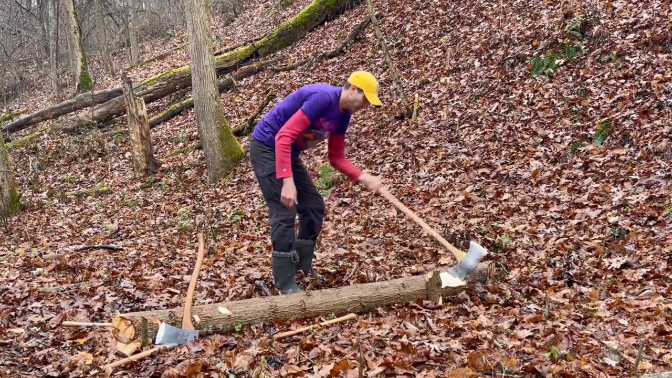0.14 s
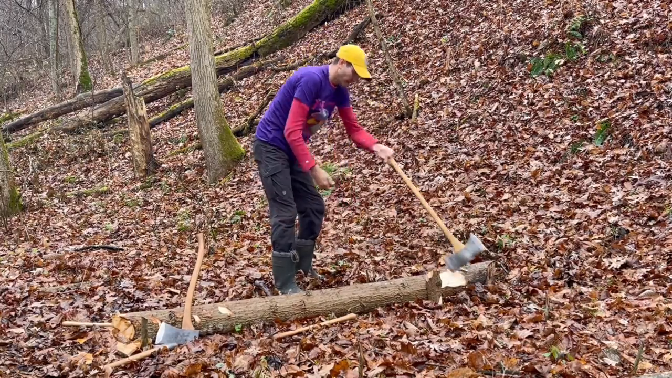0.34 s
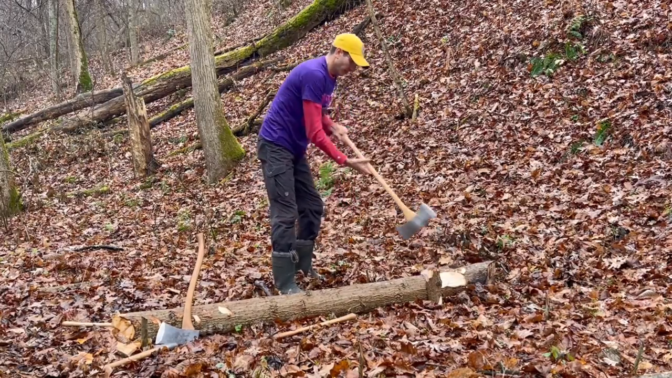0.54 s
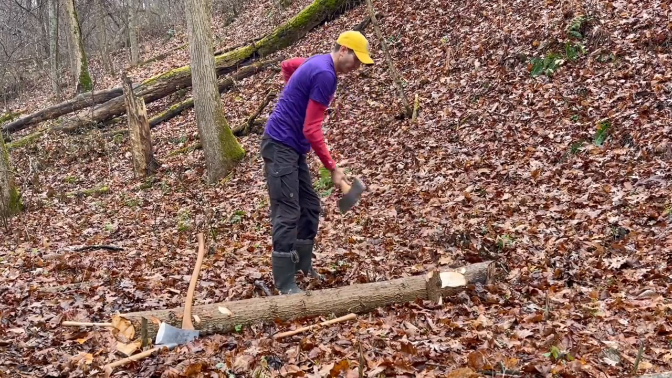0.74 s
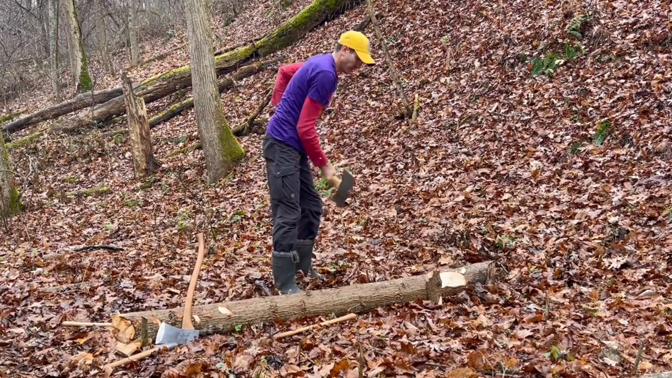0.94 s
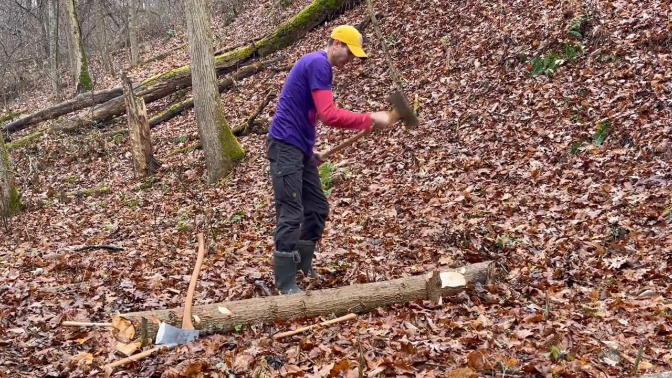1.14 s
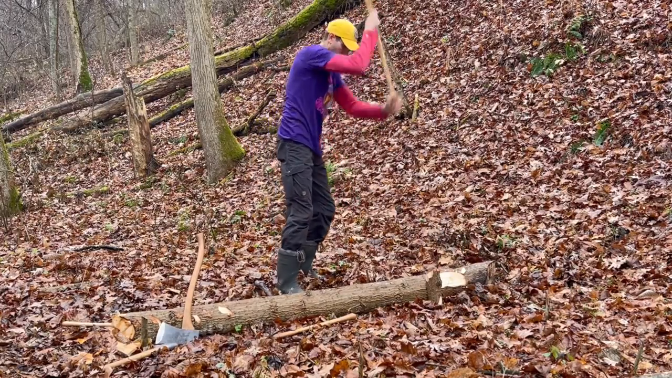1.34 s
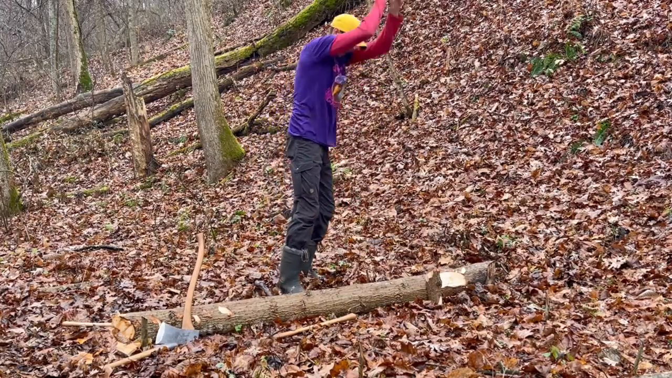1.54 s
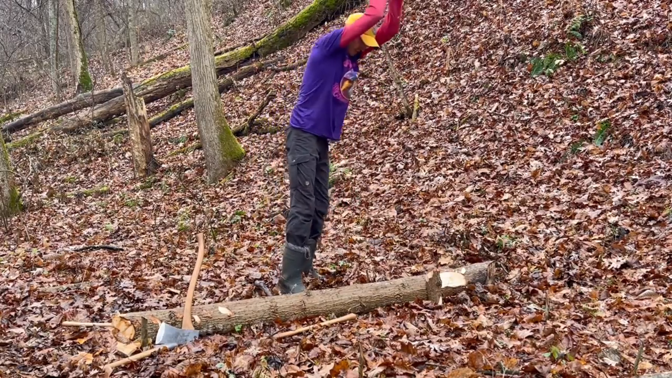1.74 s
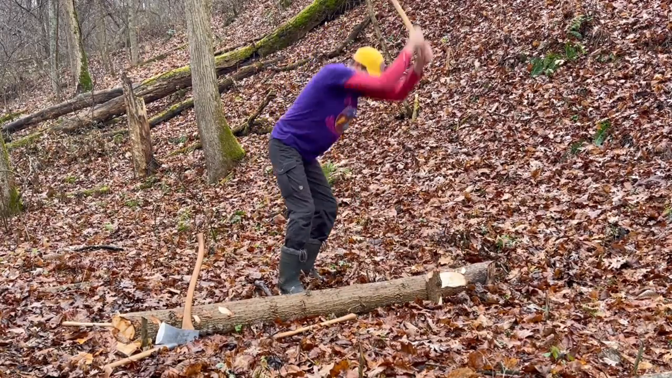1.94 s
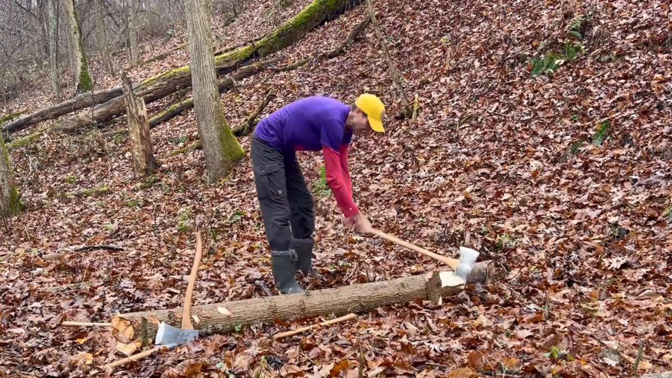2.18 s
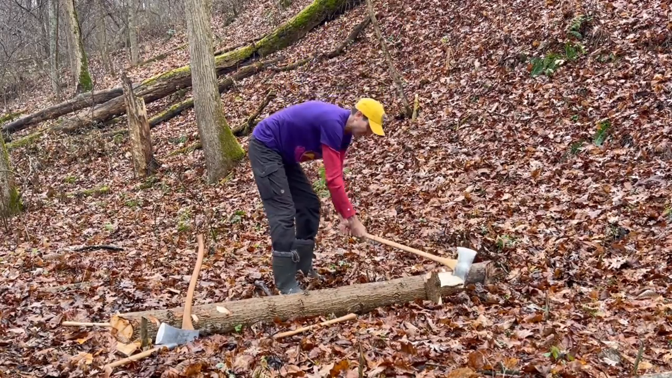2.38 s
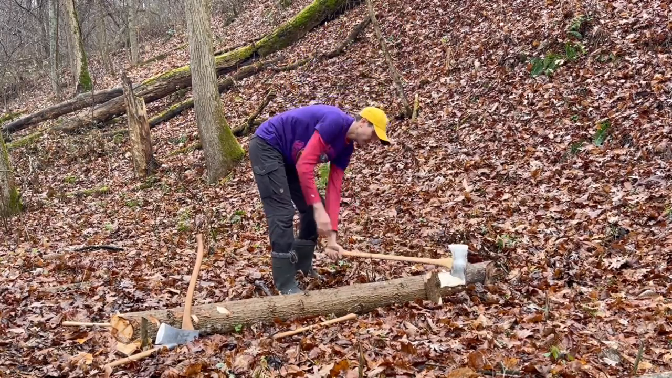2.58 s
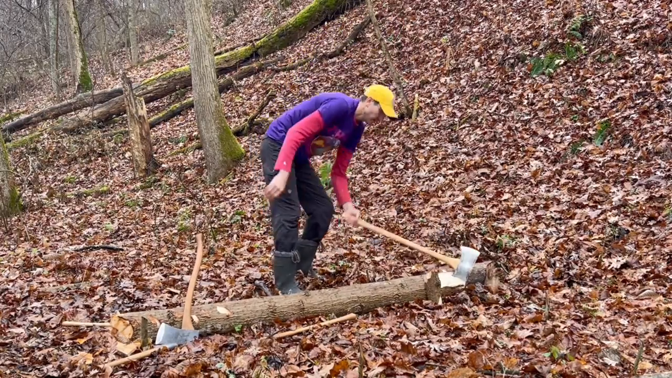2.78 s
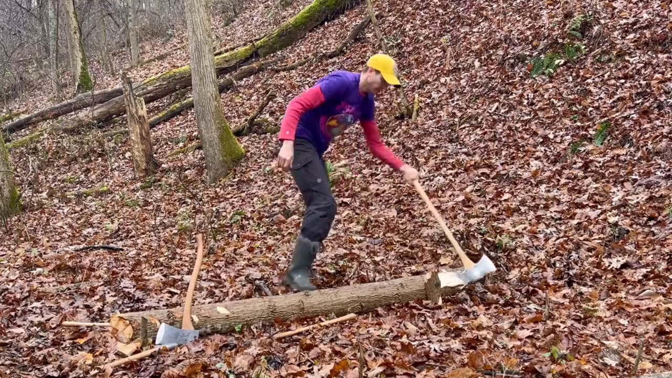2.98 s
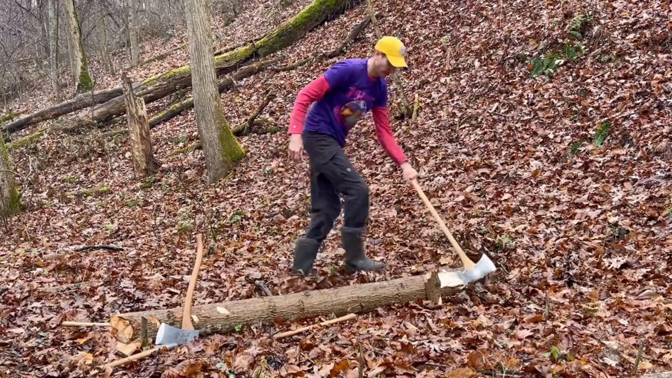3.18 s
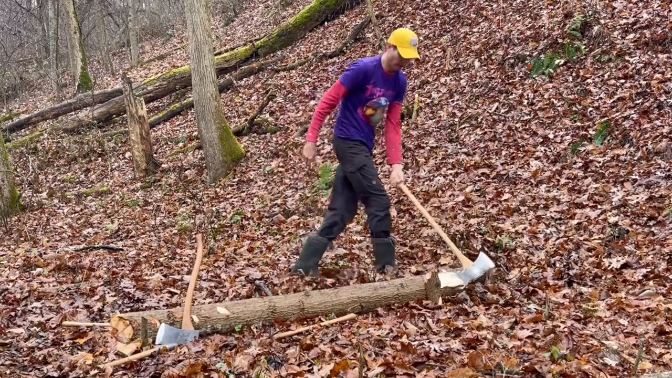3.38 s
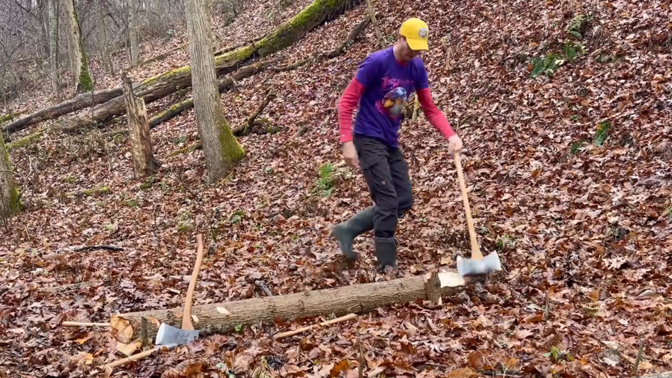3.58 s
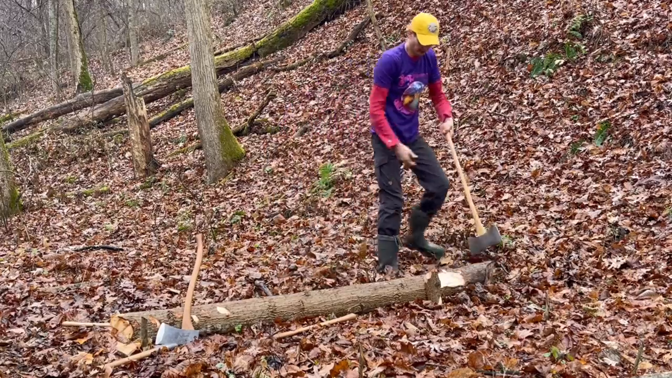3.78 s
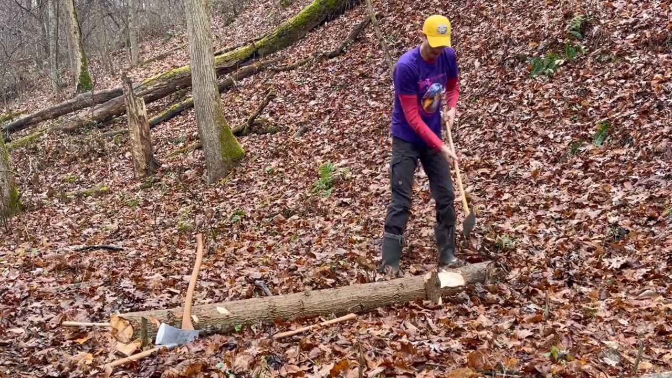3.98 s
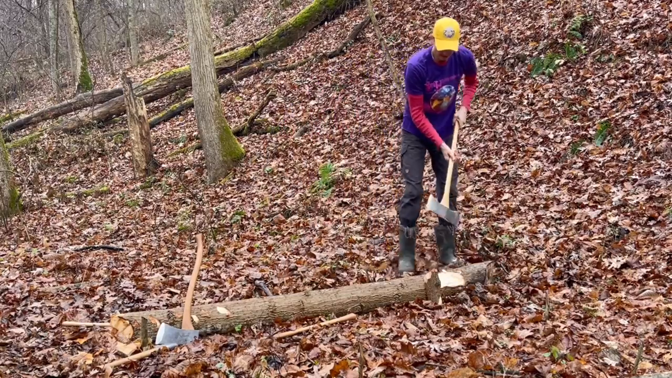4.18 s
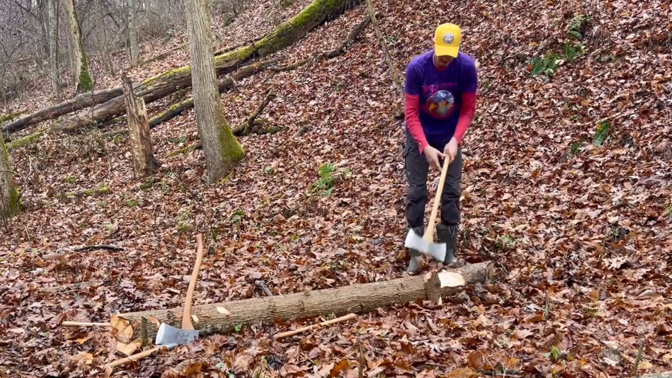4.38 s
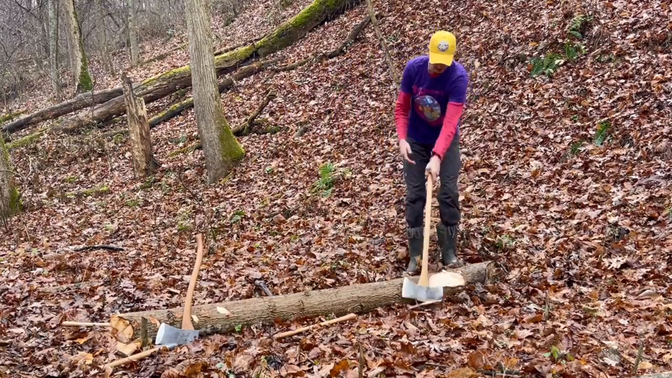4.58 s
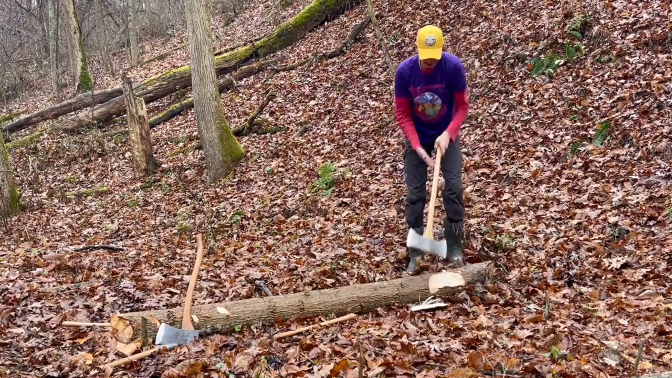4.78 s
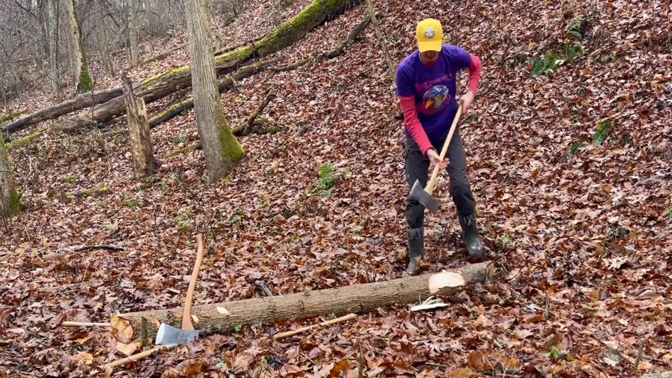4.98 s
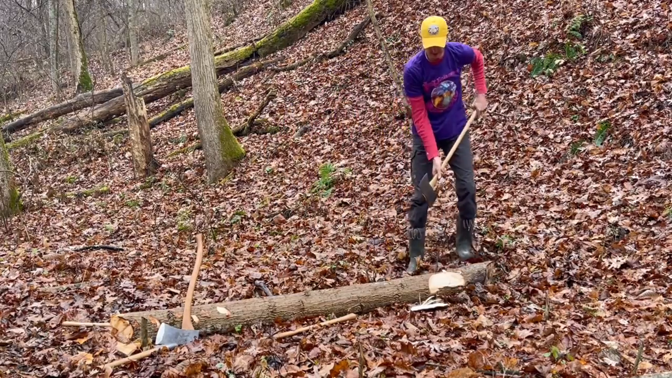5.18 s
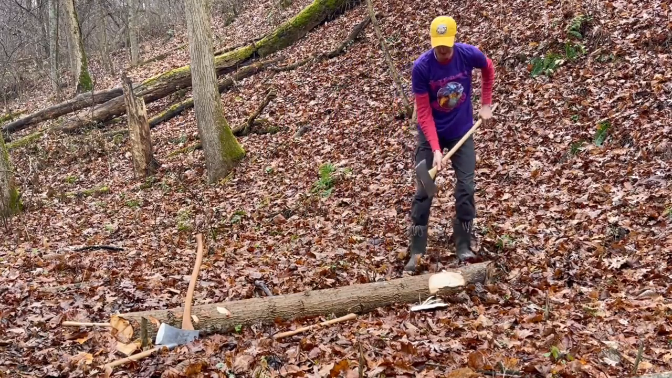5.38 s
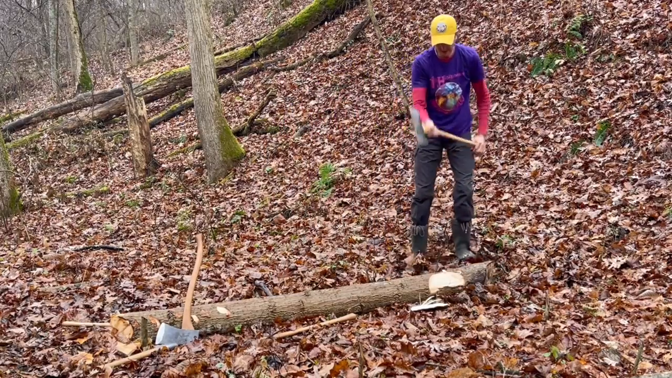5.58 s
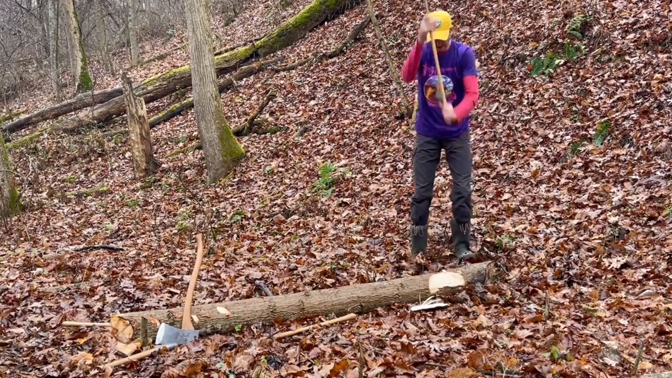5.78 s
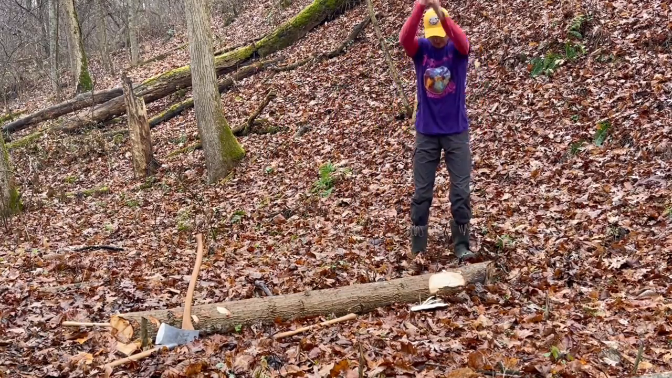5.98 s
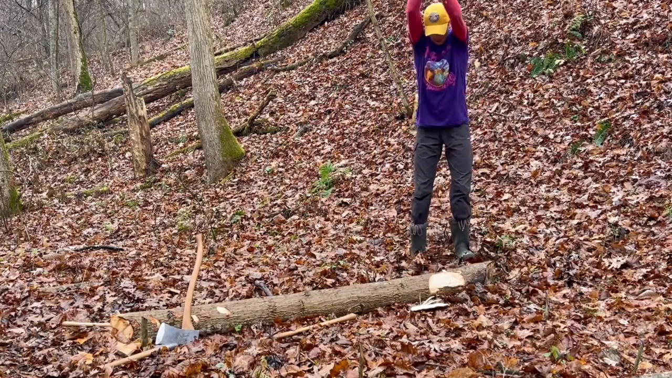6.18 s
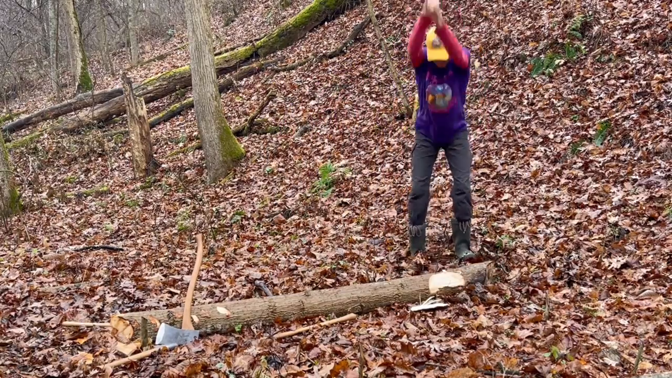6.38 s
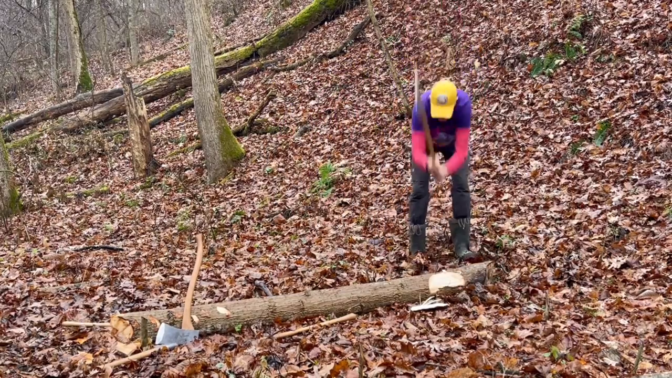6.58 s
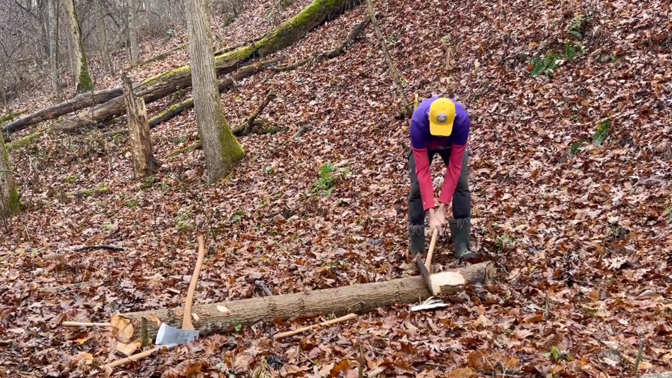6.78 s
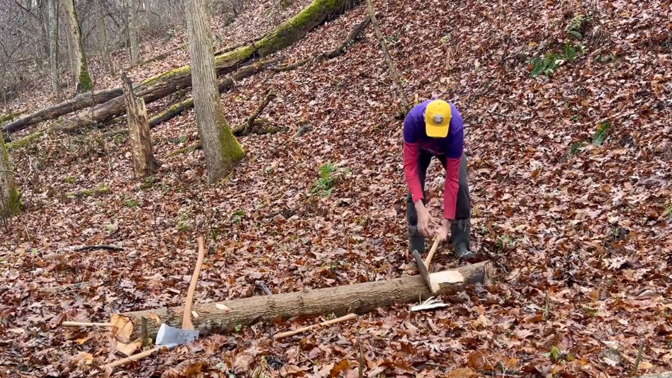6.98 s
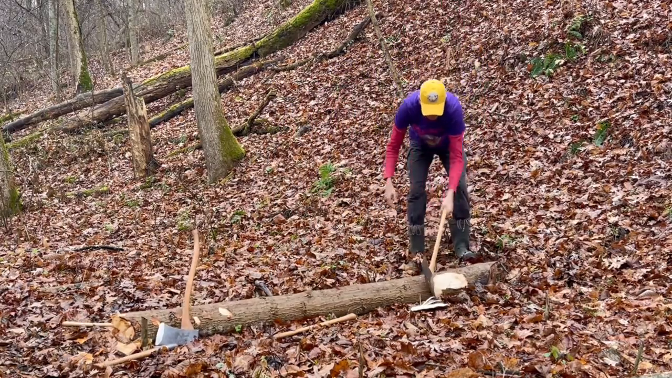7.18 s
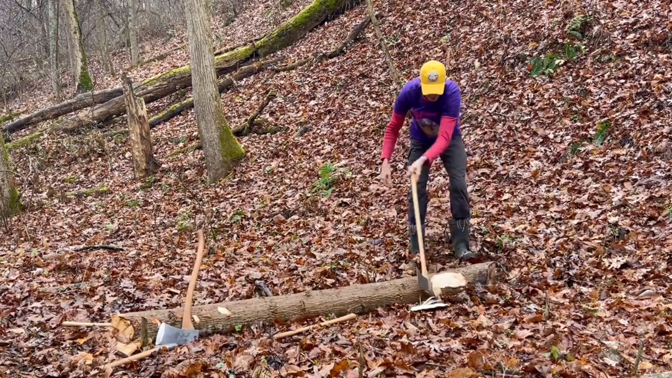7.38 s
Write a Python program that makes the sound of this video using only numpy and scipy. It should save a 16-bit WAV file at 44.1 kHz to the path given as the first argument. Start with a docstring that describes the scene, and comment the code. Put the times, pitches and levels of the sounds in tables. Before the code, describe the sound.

On a quiet leafy slope, an axe strikes a log twice, trees answering each crack, amid rustling steps, light knocks and a creaky blade-freeing.

```python
"""Still air with a faint far drone and whine, then boots wading through dry leaves and twigs snapping.
Two heavy axe blows split a log on a wooded hillside; the log rings and thuds on the soil, and trees echo
each crack. In between, the axe nudges the log; at the end the stuck blade is levered in its cut.
Breaks are short noise bursts, wood and steel are decaying modes, leaves are filtered random clicks,
and echoes are decaying noise: dense tails for all blows, extra returns for the swings."""
import sys
import numpy as np
from scipy import signal
from scipy.fft import rfft, irfft, next_fast_len
from scipy.io import wavfile

SR = 44100
rng = np.random.default_rng(int(sys.argv[2]) if len(sys.argv) > 2 else 0)


def log_audio(samples):
    """Write samples as a 16-bit WAV file to the path given in sys.argv[1]."""
    # one column per channel
    frames = np.atleast_2d(samples).T
    # limit to full scale, then quantise
    limited = np.clip(frames, -1, 1)
    pcm = np.round(limited * 32767).astype(np.int16)
    wavfile.write(sys.argv[1], SR, pcm)


N = 327663
T = np.arange(N) / SR

# distant air: (frequency [Hz], level [dB])
AIR_SPECTRUM = [(20, -57.5), (50, -39.5), (85, -38.5), (130, -50.5), (230, -61.5), (500, -57), (720, -59),
                (1100, -67.5), (2400, -76.5), (4000, -84), (9000, -86), (11500, -92), (14000, -106)]
# far whine coming and going: (time of peak [s], level added to the rest level [dB], rise and fall [s])
WHINE_SWELLS = [(0, -76, .5), (1.0, -72.5, .4), (2.6, -70.5, .5), (5.65, -73.5, .7)]
WHINE_REST_DB = -83.5
# boot sweeps through leaves: (time of peak [s], relative crunch level [dB],
# crisp over crunch before their gains [dB], rise [s], fall [s])
LEAF_SWEEPS = [(0.02, -64.5, 3.5, 0.17, 0.083), (0.18, -63, 3, 0.074, 0.079), (0.45, -72, 7, 0.073, 0.063),
               (1.28, -83, 9, .1, 0.16), (1.87, -73.5, -2, 0.21, 0.45), (2.75, -63.5, -1.5, 0.14, 0.092),
               (2.88, -62, 8, 0.06, 0.064), (3.06, -55, 4, 0.14, 0.067), (3.371, -60, 5.5, .11, 0.12),
               (3.69, -56, 0.5, .11, 0.083), (4.0, -60.5, 3.5, 0.22, 0.16), (4.109, -62.5, 5, 0.07, 0.05),
               (4.275, -53, 0.5, 0.015, 0.097), (4.4, -63, 7, 0.11, 0.098), (4.78, -62.5, 4, 0.21, 0.066),
               (4.95, -60.5, 2, 0.12, 0.12), (5.257, -58, 3.5, .08, 0.07), (5.73, -76.5, 5.5, .07, 0.13),
               (5.88, -78, -4, .3, .13), (6.3, -71.5, 1, 0.13, .16), (6.98, -65.5, -1.5, 0.09, 0.16),
               (7.14, -64.5, -4.5, 0.082, 0.13), (7.42, -67, -5, 0.073, .08)]
SWELL_SHAPE = 1.4  # exponent: 1 = pointed, 2 = bell-shaped
REST_CRUNCH_DB, REST_CRISP_DB = -80.5, -86  # leaves under a standing body, before their gains
# leaf crunch colour: (frequency [Hz], level [dB])
CRUNCH_COLOUR = [(100, -2), (220, 0), (450, -4.5), (900, -1), (1500, 0), (2200, 2), (3200, -4), (5000, -11),
                 (14000, -48.5)]
# crisp leaf-top colour: (frequency [Hz], level [dB])
CRISP_COLOUR = [(1000, -25.5), (2500, -1), (4000, -1), (5500, 0.5), (8000, -5), (10000, -3.5), (11400, -3),
                (12600, -22), (16000, -35)]
# breaking twigs and stalks, plus the sharp contact cracks of the axe knocking the log at 3.403, 4.255 and 4.325
# s: (time [s], relative level [dB], brightness [dB/octave])
SHARP_SNAPS = [(0.064, -45.5, 0.5), (0.109, -41, -4), (0.342, -58.5, 4.5), (0.375, -55.5, 1),
               (0.44, -49.5, -6), (0.623, -52.5, 0), (0.665, -59, -0.5), (0.731, -49.5, -4), (1.162, -56, 0),
               (1.169, -55.5, 1), (1.3425, -45.5, 0), (1.494, -57, -3.5), (1.53, -53, -6), (2.71, -46, -2),
               (3.403, -31, -2), (3.582, -49, -6.5), (3.609, -47.5, 0.5), (4.211, -53, -1.5),
               (4.255, -40, -2), (4.325, -39, -6.5), (5.049, -62, 6.5), (5.141, -57, 1.5), (5.494, -61.5, 2),
               (5.777, -58.5, 1.5), (7.133, -44.5, -1)]
# dry twig colour: (frequency [Hz], level [dB])
TWIG_COLOUR = [(150, -15.5), (900, -2), (2500, 0.5), (6000, -1), (11000, -2.5), (15000, -26.5)]
TWIG_PIVOT_HZ, TWIG_TILT_OCTAVES = 2389, 2.5  # tilt centre; tilt range each way
# scatter from nearby ground: (frequency [Hz], relative level [dB])
GROUND_COLOUR = [(100, -15.5), (400, -3.5), (1000, -6), (2500, -3), (5000, -2.5), (9000, 3), (11500, -2.5),
                 (15000, -8.5)]
# scatter from the trees: (frequency [Hz], relative level [dB], t60 [s])
TREE_SCATTER = [(100, -34.5, .7), (260, -43, .7), (500, -36, 1.8), (1000, -36, 1.4), (2400, -33, 0.96),
                (4022, -34, 1.4), (8000, -27.5, 1.3), (11500, -38, .8), (14040, -39.5, .6)]
# full swings: (time [s], splitting level [dB], cutting time [s], splintering t60 [s])
SWINGS = [(1.9716, 2.5, 0.0029, 0.019), (6.4729, -0.5, 0.0054, 0.0062)]
# splitting wood: (frequency [Hz], relative level in first swing [dB], in second [dB])
SPLIT_COLOUR = [(100, -17.5, -18.5), (190, -3.5, -1), (330, -3, 5), (520, -2.5, -3.5), (885, 4, -4.5),
                (1401, 0, -2.5), (1920, -5, -4.5), (2830, -3.5, -7.5), (3744, -18, -11), (5630, -18.5, -13),
                (7974, -28, -17.5), (12200, -22.5, -20.5), (13500, -41, -43)]
# log bending modes: (frequency [Hz], t60 [s], level struck near the end [dB], struck further in [dB])
LOG_MODES = [(101.7, 0.49, -26.5, -26.5), (263, 0.21, -18, -19), (458, 0.091, -15.5, -12),
             (650, 0.051, -14, -13.5), (864, 0.055, -13, -15.5), (1111.4, 0.053, -22.5, -15),
             (1334, 0.091, -28.5, -27), (1690, 0.046, -26, -37)]
# axe modes: (frequency [Hz], t60 [s], level in first swing [dB], in second [dB])
AXE_MODES = [(2130, 1, -60.5, -50), (2210, 0.96, -59.5, -51), (2320, .6, -60.5, -51),
             (2380, .06, -30.5, -28), (2860, 0.11, -34.5, -51.5), (3420, 0.034, -42.5, -21)]
# log pressing into soil: (time [s], peak level [dB], frequency [Hz], swell time [s])
SOIL_THUDS = [(1.973, -16, 170, 0.0052), (1.992, -25, 55, 0.017), (2.098, -39.5, 52, 0.022),
              (2.135, -42.5, 108.2, 0.021), (4.257, -30, 200, 0.0024), (4.297, -32, 135, 0.0052),
              (6.476, -24, 168, 0.0074), (6.493, -25.5, 54.6, 0.016), (6.602, -45, 54.3, 0.027)]
# first trunk's answer: (frequency [Hz], level relative to first swing [dB], to second [dB])
TRUNK_COLOUR = [(200, -55, -56), (900, -32, -42), (1800, -30.5, -43), (2200, -36, -18.5),
                (2870, -33.5, -47), (3600, -54, -40.5), (11000, -64, -56), (15000, -90, -90)]
TRUNK_LAG_S = .119
# far slope's answer: (frequency [Hz], level relative to first swing [dB], to second [dB])
SLOPE_COLOUR = [(149, -40.5, -41.5), (266, -37.5, -43.5), (473, -36.5, -34.5), (780, -38.5, -51),
                (900, -32.5, -41), (1048, -38, -39.5), (1400, -42.5, -61), (1910, -39.5, -43),
                (2200, -38, -30.5), (2530, -36.5, -50), (2770, -41.5, -40), (3070, -56.5, -49),
                (10800, -67, -79), (15000, -110, -110)]
# boots and axe head on the leaf bed: (time [s], thump level [dB], crush level [dB], swell time [s])
LEAF_TREADS = [(3.34, -47, -61, 0.012), (3.373, -48, -69, 0.011), (3.402, -38, -41, 0.0036),
               (3.427, -53, -74, 0.014), (3.60, -55, -56.5, 0.019), (3.675, -53, -64, 0.023),
               (4.256, -50, -46.5, 0.0072), (4.909, -54.5, -57.5, 0.02), (6.946, -55, -75, 0.015)]
# soil thump colour: (frequency [Hz], level [dB])
SOIL_COLOUR = [(50, -5), (110, 2.5), (200, 0.5), (300, -7), (450, -16), (900, -26), (4000, -66)]
# light blows on the log: (time [s], level over the log modes [dB], softness cut-off [Hz])
LOG_KNOCKS = [(3.403, -33, 2200), (4.254, -26.5, 1510), (4.2952, -0.5, 351), (4.3192, -23.5, 2200),
              (4.325, -29, 1800)]
# squeaks, and a faint far chirp at 5.39 s: (time of peak [s], frequency at peak [Hz], fall [Hz/s], level [dB],
# half-length [s])
SQUEAK_EVENTS = [(4.48, 2680, 0, -60, 0.014), (4.478, 5800, 3, -58, 0.02), (5.391, 1810, 7599.5, -61, 0.02)]
# blade slipping in its cut: (time [s], relative wood level [dB], relative steel level [dB])
BLADE_SLIPS = [(6.912, -26, -17), (6.929, -17.5, 4), (7.2433, -22, -26.5), (7.2805, 1, -16),
               (7.282, -12, -4), (7.2834, -30, -22), (7.298, -31, -29), (7.321, -15.5, -29.5),
               (7.331, -20, -30), (7.338, -15.5, -28.5)]
# handle and cut ringing together: (frequency [Hz], t60 [s], relative level [dB])
HANDLE_MODES = [(429, 0.1, -46), (960, 0.21, -44), (1063, 0.11, -45), (1405, 0.16, -50.5),
                (1635, 0.083, -39.5), (2100, 0.11, -44), (2180, 0.087, -59), (2500, 0.046, -54),
                (2885, 0.038, -39), (2720, 0.04, -60), (4050, 0.044, -52)]
# thin steel edge: (frequency [Hz], t60 [s], relative level [dB])
EDGE_MODES = [(5790, 0.11, -64), (10050, 0.036, -53)]
# rubbing fibres: (frequency [Hz], relative level [dB])
RUB_COLOUR = [(200, -5.0), (900, 21.5), (3000, 17.5), (4500, -21), (12000, -32)]
# phase-shifted part of the stereo sides: (frequency [Hz], side over mid [dB])
SIDE_WIDTH = [(40, -25.5), (120, -25), (260, -15), (700, -6.5), (1400, -16), (3000, -16), (5000, -15.5),
              (8000, -18)]
# width of the far echoes: (frequency [Hz], side over mid [dB])
ECHO_SIDE_WIDTH = [(100, -24), (380, -5.5), (700, -3), (1300, -4.5), (2400, -16.5), (4400, -13.5),
                   (9000, -15.5)]
# microphone balance: (frequency [Hz], left over right [dB])
LEFT_OVER_RIGHT = [(30, .3), (80, 1.24), (250, 1.86), (500, 1.26), (1200, 1.5), (2400, -0.45),
                   (12000, -0.14)]
CUTOFF_HZ = 16000


def from_db(db):
    """Decibels to gain."""
    return 10 ** (np.asarray(db) / 20)


def rms_one(x):
    """Scale to unit power."""
    return x / np.sqrt(np.mean(x ** 2) + 1e-20)


def at_hz(points, hz, axis=1):
    """Read one table column on a log-frequency axis."""
    points = np.array(points)
    return np.interp(np.log(np.maximum(hz, 1)), np.log(points[:, 0]), points[:, axis])


def add(out, time_s, x):
    """Mix a sound in at a given time."""
    start = round(time_s * SR)
    out[start:start + len(x)] += x[:max(N - start, 0)]


def coloured(x, points, axis=1, size=4096):
    """Causal minimum-phase filter with the given spectrum, built by folding the cepstrum."""
    magnitude = from_db(at_hz(points, np.fft.rfftfreq(size, 1 / SR), axis))
    cepstrum = irfft(np.log(magnitude))
    cepstrum[1:size // 2] *= 2
    cepstrum[size // 2 + 1:] = 0
    impulse = irfft(np.exp(rfft(cepstrum)))
    return signal.oaconvolve(x, impulse)[:len(x)]


def weighted(x, points):
    """Zero-phase spectral weighting."""
    size = next_fast_len(N, True)
    gain = from_db(at_hz(points, np.fft.rfftfreq(size, 1 / SR)))
    return irfft(rfft(x, size) * gain, size)[:N]


def dying(t, t60):
    """Exponential decay by 60 dB per t60, flat before time zero."""
    return np.exp(-np.log(1000) * np.maximum(t, 0) / t60)


def ring(hz, t60, db):
    """One struck mode: a decaying sine, a second long."""
    t = T[:SR]
    return from_db(db) * np.sin(2 * np.pi * hz * t) * dying(t, t60)


def drift(rate_hz):
    """Random wander of unit power, in straight lines between random knots."""
    knots = rng.standard_normal(int(N / SR * rate_hz) + 2)
    return rms_one(np.interp(T * rate_hz, np.arange(len(knots)), knots))


def swell(time_s, rise_s, fall_s):
    """Gain that peaks at a given time and is 10 dB down one rise before and one fall after."""
    gain = np.zeros(N)
    first = max(int((time_s - 4 * rise_s) * SR), 0)
    near = slice(first, int((time_s + 4 * fall_s) * SR))
    t = T[near] - time_s
    gain[near] = from_db(-10 * np.maximum(-t / rise_s, t / fall_s) ** SWELL_SHAPE)
    return gain


def fracture(hold_s, t60, size=4096, order=192):
    """Burst of tiny breaks: flat-spectrum noise blocks, held for a moment, then dying."""
    pieces = np.exp(2j * np.pi * rng.random((size // order + 1, order // 2 + 1)))
    noise = rms_one(irfft(pieces).ravel()[:size])
    return noise * dying(T[:size] - hold_s, t60)


def grains(per_s, spread_db):
    """Random clicks of very uneven size and either sign."""
    sizes = from_db(spread_db * np.minimum(rng.exponential(1, N), 4))
    signs = rng.choice([-1, 1], N)
    return rms_one(sizes * signs * (rng.random(N) < per_s / SR))


def distance(hum_hz=82.9, hum_db=-57.0, whine_hz=679.4):
    """Still air as filtered noise; far machinery as a wavering drone and a faint whine."""
    air = coloured(rng.standard_normal(N), AIR_SPECTRUM)
    hum_gain = from_db(hum_db + 1.6 * drift(14))
    hum = hum_gain * np.sin(2 * np.pi * hum_hz * T + .35 * drift(10))
    whine_gain = from_db(WHINE_REST_DB)
    for time_s, db, width_s in WHINE_SWELLS:
        whine_gain = whine_gain + from_db(db) * swell(time_s, width_s, width_s)
    whine = whine_gain * np.sin(2 * np.pi * whine_hz * T + .7 * drift(16))
    return air + hum + whine


def leaves(crunch_db=10.5, crisp_db=6.0, ticks_per_s=110):
    """Boot sweeps swell and fade: leaves crunch below and crackle on top, in clumps, with stalk ticks."""
    crunch_power, crisp_power = from_db(REST_CRUNCH_DB) ** 2, from_db(REST_CRISP_DB) ** 2
    for time_s, db, top_db, rise_s, fall_s in LEAF_SWEEPS:
        power = (from_db(db) * swell(time_s, rise_s, fall_s)) ** 2
        crunch_power = crunch_power + power
        crisp_power = crisp_power + power * from_db(top_db) ** 2
    clumps = from_db(1.8 * drift(110))
    ticks = from_db(-6) * grains(ticks_per_s, 3.0)
    crunch = coloured(grains(3000, 3.5) + ticks, CRUNCH_COLOUR)
    crisp = coloured(grains(5000, 4.0) + ticks, CRISP_COLOUR)
    low = np.sqrt(crunch_power) * from_db(crunch_db) * crunch
    high = np.sqrt(crisp_power) * from_db(crisp_db) * crisp
    return clumps * (low + high)


def snaps(snap_db=6.5, hold_s=0.00049, t60=0.01):
    """Brittle sticks, and wood struck by the axe, crack in under a millisecond; thin ones sound brighter than
    thick ones."""
    out = np.zeros(N)
    hz, twig_db = np.transpose(TWIG_COLOUR)
    octaves = np.clip(np.log2(hz / TWIG_PIVOT_HZ), -TWIG_TILT_OCTAVES, TWIG_TILT_OCTAVES)
    for time_s, db, db_per_octave in SHARP_SNAPS:
        colour = np.column_stack([hz, twig_db + db_per_octave * octaves])
        add(out, time_s, from_db(snap_db + db) * coloured(fracture(hold_s, t60), colour))
    return out


def hillside(x, near_db=-35.5, near_t60=0.15, build_s=.03, trees_db=-26.0):
    """Nearby ground scatters from 4 ms on; trunks build up and die away, each band at its own rate."""
    t = T[:SR * 3 // 2]
    ground = from_db(near_db) * dying(t, near_t60) * (t > .004) * rng.standard_normal(len(t))
    ground = coloured(ground, GROUND_COLOUR)
    trees, build = 0, (1 - np.exp(-t / build_s)) * from_db(trees_db)
    edges_hz = 70 * 2 ** np.arange(0, 8.1, 2 / 3)
    for low_hz, high_hz in zip(edges_hz, edges_hz[1:]):
        hz = np.sqrt(low_hz * high_hz)
        bandpass = signal.butter(2, [low_hz, high_hz], "band", fs=SR, output="sos")
        band = signal.sosfilt(bandpass, rng.standard_normal(len(t)))
        decay = dying(t, at_hz(TREE_SCATTER, hz, axis=2))
        trees = trees + band * build * from_db(at_hz(TREE_SCATTER, hz)) * decay
    return signal.fftconvolve(x, ground)[:N], signal.fftconvolve(x, trees)[:N]


def blurred(x, above_hz=1100.0, wander_rad=2.0, wander_hz=130.0):
    """Countless paths through branches scramble the phase of an echo's treble, so it does not ring."""
    high = weighted(x, [(above_hz / 2, -60), (above_hz, 0)])
    turning = np.exp(1j * wander_rad * drift(wander_hz))
    analytic = signal.hilbert(high, next_fast_len(N))[:N]
    return x - high + np.real(analytic * turning)


def chops(ring_lag_s=.0022):
    """The blade splits fibres for a few milliseconds; its push sets log and axe modes ringing."""
    out = np.zeros(N)
    for k, (time_s, db, hold_s, t60) in enumerate(SWINGS):
        split = coloured(fracture(hold_s, t60), SPLIT_COLOUR, axis=k + 1)
        add(out, time_s, from_db(db) * split)
        for j, (hz, mode_t60, *levels_db) in enumerate([*LOG_MODES, *AXE_MODES]):
            polarity = (-1) ** j
            add(out, time_s + ring_lag_s, polarity * ring(hz, mode_t60, levels_db[k]))
    return out


def thuds():
    """Soft soil swells and gives way within a few cycles of a low sine."""
    out, t = np.zeros(N), T[:SR // 2]
    for time_s, db, hz, swell_s in SOIL_THUDS:
        envelope = (t / swell_s * np.exp(1 - t / swell_s)) ** 2
        add(out, time_s, from_db(db) * envelope * np.sin(2 * np.pi * hz * t))
    return out


def trunk_echo(hold_s=0.0042, t60=0.027):
    """One big trunk throws each crack back as a short slap, just ahead of the slope."""
    out = np.zeros(N)
    for k, (time_s, db, *_) in enumerate(SWINGS):
        slap = coloured(fracture(hold_s, t60), TRUNK_COLOUR, axis=k + 1)
        add(out, time_s + TRUNK_LAG_S, from_db(db) * slap)
    return out


def slope_echo(lag_s=0.15, build_s=0.013, t60=1.0):
    """The far slope answers each swing after a moment, in uneven lumps from trunk after trunk."""
    out, t = np.zeros(N), T[:SR * 3 // 2]
    for k, (time_s, db, *_) in enumerate(SWINGS):
        smear = rng.standard_normal(len(t)) * (1 - np.exp(-t / build_s)) * dying(t, t60)
        add(out, time_s + lag_s, from_db(db) * coloured(smear, SLOPE_COLOUR, axis=k + 1))
    return out * from_db(2.2 * drift(90))


def treads():
    """Weight sinks into the leaf bed: a dull, uneven thump under a burst of crushed leaves."""
    out, t = np.zeros(N), T[:SR // 4]
    for time_s, thump_db, crush_db, swell_s in LEAF_TREADS:
        thump = rms_one(coloured(fracture(1, 1, size=len(t)), SOIL_COLOUR))  # held throughout
        crisp = coloured(rng.standard_normal(len(t)), CRISP_COLOUR)
        crunch = coloured(rng.standard_normal(len(t)), CRUNCH_COLOUR)
        crush = rms_one(crisp + crunch)
        envelope = t / swell_s * np.exp(1 - t / swell_s)
        add(out, time_s, envelope * (from_db(thump_db) * thump + from_db(crush_db) * crush))
    return out


def knocks(lowest_mode_db=-14, t60_factor=0.64):
    """Blunt contacts wake only the lower modes of the log, and hardly move its whole length."""
    out, log = np.zeros(N), 0
    for j, (hz, t60, _, db) in enumerate(LOG_MODES):
        log = log + (-1) ** j * ring(hz, t60 * t60_factor, db + lowest_mode_db * (j == 0))
    for time_s, db, cutoff_hz in LOG_KNOCKS:
        lowpass = signal.butter(4, cutoff_hz, fs=SR, output="sos")
        add(out, time_s, from_db(db) * signal.sosfilt(lowpass, log))
    return out


def squeaks():
    """Brief, unsteady squeaks as the axe is shifted and the stance is set, and one faint far chirp: phase-
    jittered sines."""
    out, t = np.zeros(N), T[:SR // 5] - .1
    for time_s, hz, fall_hz_per_s, db, width_s in SQUEAK_EVENTS:
        scratch_rad = 1.2 * drift(300)[:len(t)]
        phase = 2 * np.pi * (hz - fall_hz_per_s * t / 2) * t + scratch_rad
        add(out, time_s + t[0], from_db(db) * np.exp(-(t / width_s) ** 2) * np.sin(phase))
    return out


def levering(rub_db=-44):
    """Each slip of the blade jolts the handle and pings the edge, with a little rubbing of fibres."""
    out = np.zeros(N)
    for time_s, wood_db, steel_db in BLADE_SLIPS:
        for modes, db in ((HANDLE_MODES, wood_db), (EDGE_MODES, steel_db)):
            for hz, t60, mode_db in modes:
                add(out, time_s, ring(hz, t60, db + mode_db + rng.normal(0, 1)))
        rub = coloured(fracture(0.00081, 0.026), RUB_COLOUR)
        add(out, time_s, from_db(wood_db + rub_db) * rub)
    return out


def scene(diffuse_db=-28.5):
    """Work nearly straight ahead, slightly out of phase between the sides; echoes scattered wide."""
    blows = chops() + knocks() + levering() + snaps()
    near, far = hillside(blows)
    far = blurred(far) + slope_echo() + trunk_echo()
    mid = blows + near + far + thuds() + treads() + leaves() + squeaks() + distance()
    quadrature = np.imag(signal.hilbert(mid, next_fast_len(N)))[:N]
    out_of_step = weighted(quadrature, SIDE_WIDTH)
    scatter = fracture(.02, .08) * (T[:4096] > .005)
    scatter = scatter / np.linalg.norm(scatter)
    around = from_db(diffuse_db) * mid + weighted(far, ECHO_SIDE_WIDTH)
    side = out_of_step + signal.oaconvolve(around, scatter)[:N]
    return np.array([mid + side, mid - side])


def record(dry, port_hz=11005.0, port_q=7.6, port_gain=2.06, turn_hz=10120.0, turn_q=6.6, low_cut_hz=36.0):
    """Ports resonate in the treble, the right one lagging a full turn; rumble is cut, peaks rounded."""
    dry = signal.sosfilt(signal.butter(5, low_cut_hz, "high", fs=SR, output="sos"), dry)
    resonance = signal.lfilter(*signal.iirpeak(port_hz, port_q, fs=SR), dry)
    left, right = dry + port_gain * resonance
    # input minus twice its peak band = all-pass
    right = right - 2 * signal.lfilter(*signal.iirpeak(turn_hz, turn_q, fs=SR), right)
    left = weighted(left, [(hz, db / 2) for hz, db in LEFT_OVER_RIGHT])
    right = weighted(right, [(hz, -db / 2) for hz, db in LEFT_OVER_RIGHT])
    rounded = np.tanh(np.array([left, right]))
    return signal.sosfilt(signal.ellip(10, .1, 80, CUTOFF_HZ, fs=SR, output="sos"), rounded)


dry = scene()
out = record(dry)
log_audio(out)
```